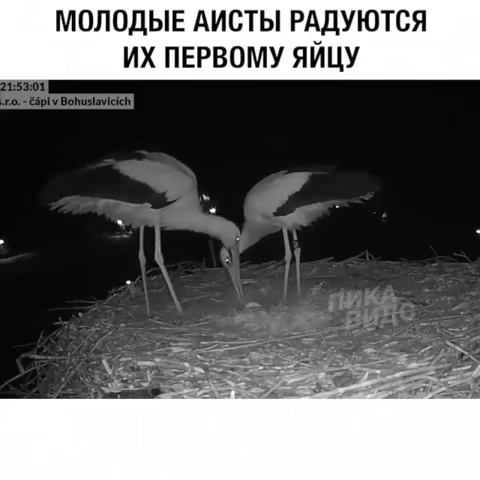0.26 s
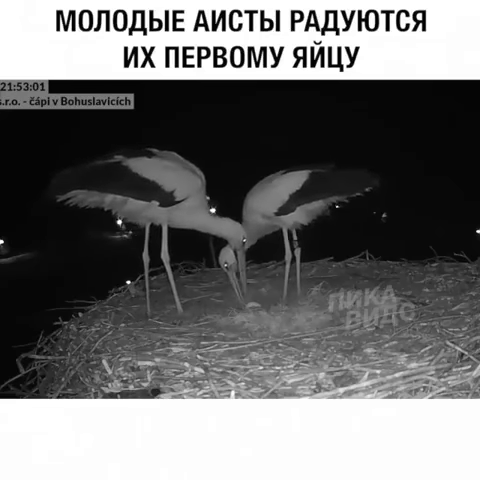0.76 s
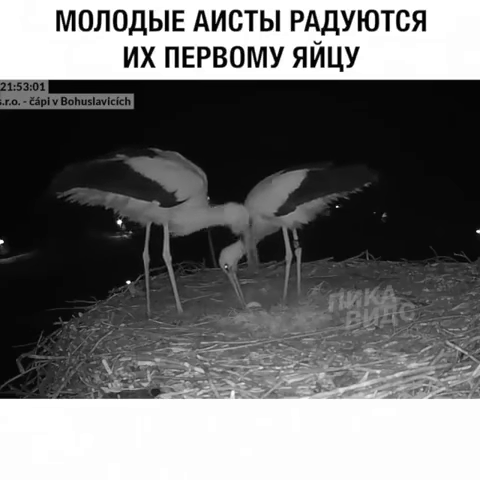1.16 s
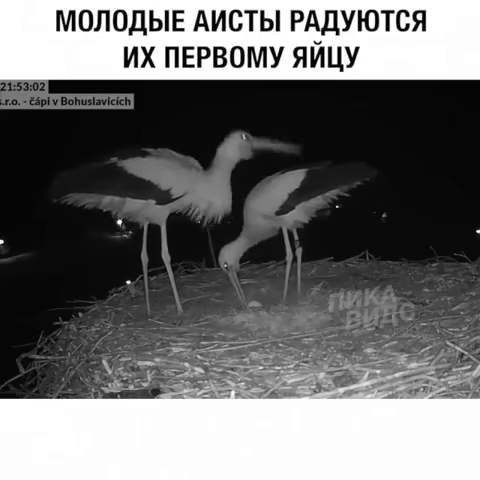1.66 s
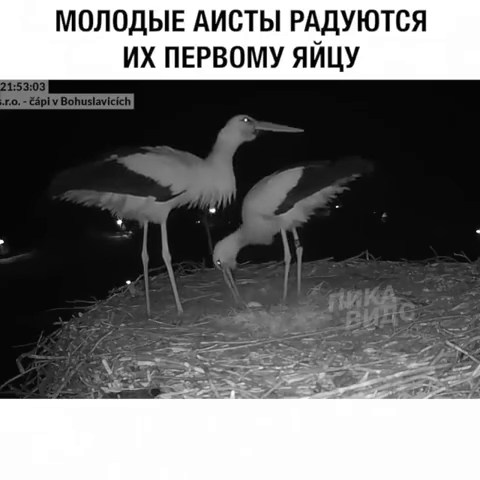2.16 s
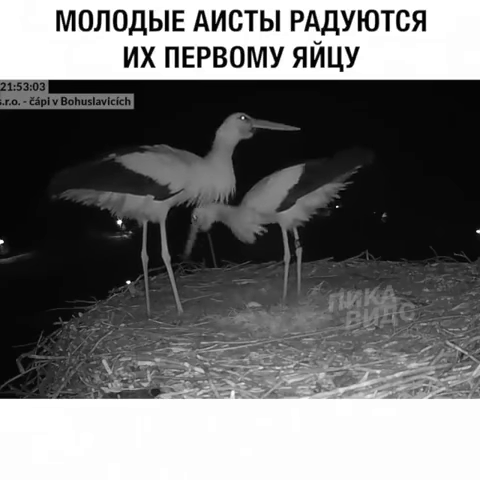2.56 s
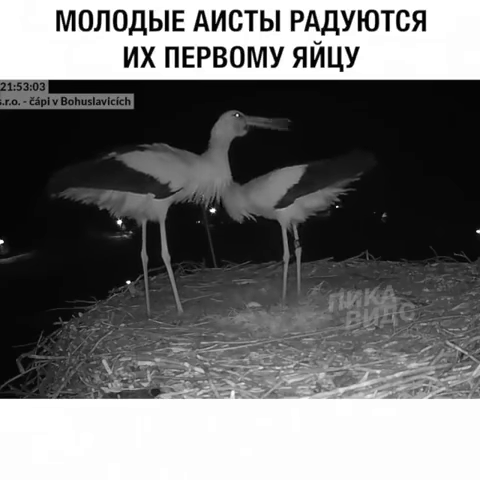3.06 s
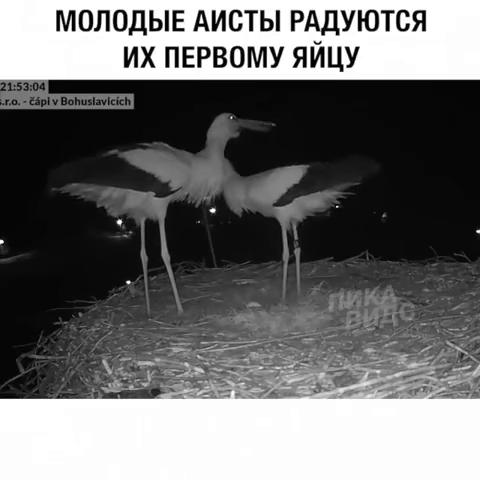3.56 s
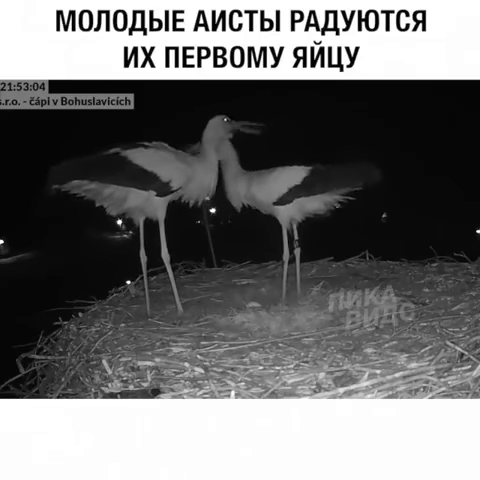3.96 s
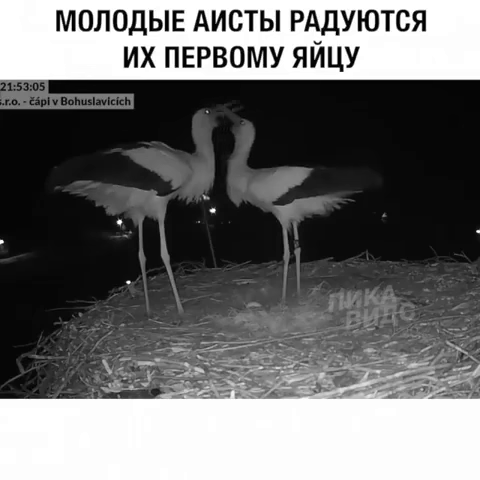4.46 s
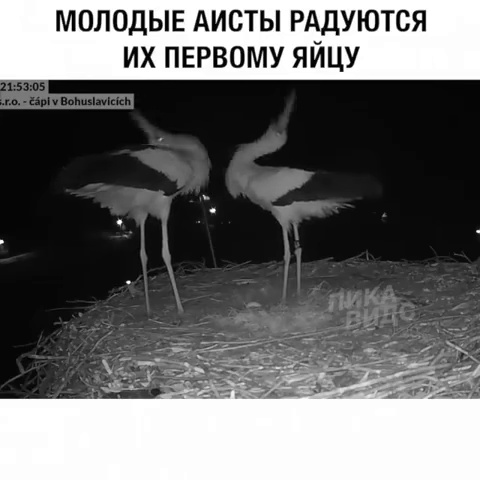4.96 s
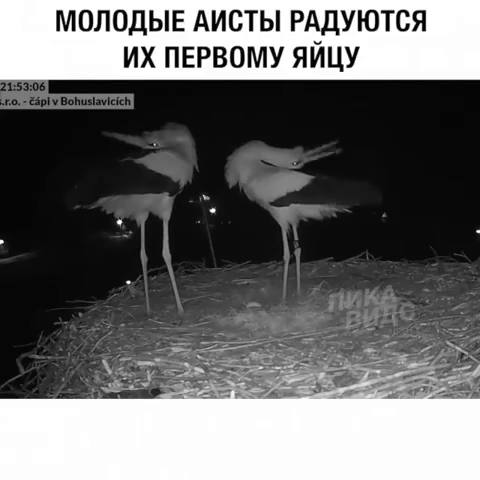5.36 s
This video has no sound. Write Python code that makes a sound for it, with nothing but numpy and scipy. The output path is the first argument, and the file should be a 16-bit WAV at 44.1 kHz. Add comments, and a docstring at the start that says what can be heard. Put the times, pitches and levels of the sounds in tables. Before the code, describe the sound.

Brief airy hisses over a steady night rush, then one stork starts dry bill clapping and a second joins, both quickening to a dense rattle.

```python
"""Short hisses over a steady night rush, then slow bill claps from one stork; its mate joins and both speed up.
Hisses are noise jets through throat resonances; dull noise bumps are feet shifting in the nest.
Each clap is a dry bill snap, a contact crack and a ringing throat pouch retuned as the neck bends.
The nest floor echoes each clap; a close nest camera overloads on the sharpest ones and limits the band."""
import sys
import numpy as np
from scipy import signal
from scipy.fft import rfft, irfft, next_fast_len
from scipy.io import wavfile
from scipy.ndimage import map_coordinates

SR = 44100
rng = np.random.default_rng(int(sys.argv[2]) if len(sys.argv) > 2 else 0)


def file_out(sig):
    """Save sig as 16-bit WAV at sys.argv[1]."""
    # one column per channel
    cols = np.atleast_2d(sig).T
    # limit, then scale
    lim = np.clip(cols, -1, 1)
    pcm = np.round(lim * 32767).astype(np.int16)
    wavfile.write(sys.argv[1], SR, pcm)


N = 246959  # length in samples

# night air and microphone noise spectrum: [freq_hz, level_db]
NIGHT_SPECTRUM = [(15, -55), (25, -20), (96, -13.5), (232, -14), (293, -8.5), (400, -9.5), (432, -6.5),
                  (763, -6.5), (1220, -10.5), (1990, -11.5), (2390, -15.5), (12200, -52), (15900, -82),
                  (22000, -120)]
# feet bumping the nest: [middle_s, length_s, level_db]
FOOT_BUMPS = [(1.46, .05, -60), (1.816, .07, -45), (4.326, 0.22, -51), (5.204, .13, -48.5)]
# hisses: [middle_s, length_s, level_db, low_resonance_hz, main_resonance_hz, fizz_db]
HISSES = [(0.45, 0.13, -39, 2070, 3170, -19), (0.662, 0.13, -35.5, 1870, 3250, -35),
          (0.927, 0.12, -38, 2310, 3330, -18), (1.1, .11, -40.5, 1340, 2930, -22),
          (1.293, 0.094, -40, 2347, 3230, -12.5), (1.457, 0.12, -35, 1180, 3300, -18.5),
          (1.529, 0.1, -43, 2130, 3100, -6.5), (1.772, 0.12, -37, 1090, 3330, -17),
          (2.122, .11, -37.5, 1180, 3040, -19), (2.311, 0.095, -45.5, 2160, 3000, -12.5)]
# fixed hiss resonances: [freq_hz, width_hz, level_db]
WINDPIPE_MODES = [(2330, 62, -1.5), (3470, 460, -1.5)]
# air at the bill's edge, spectrum: [freq_hz, level_db]
FIZZ_SPECTRUM = [(1500, -29), (3500, -3), (4700, 7), (5400, 0), (6300, 4.5), (7300, -5), (8400, -5),
                 (9300, -13), (10400, -7.5), (12000, -21)]
# horn contact spectrum: [freq_hz, level_db]
CRACK_SPECTRUM = [(1500, -6), (3500, -3), (5500, -0.5), (7500, -11.5), (10500, -16), (12000, -22.5)]
# bill tips grazing between claps: [start_s, level_db]
BILL_TICKS = [(4.3853, -41), (4.672, -42), (5.1508, -37), (5.4626, -33), (5.578, -38)]
# bill modes: [freq_hz, level_db, t60_s]
FIRST_BILL = [(1964, 2.5, 0.0022), (2220, -2, 0.011), (2890, -13, 0.016)]
MATE_BILL = [(2370, 5.5, 0.0019), (3500, -11, 0.0029)]
# throat modes: [bill_level_hz, bill_up_hz, head_back_hz, level_db, head_back_gain_db, t60_s]
FIRST_THROAT = [(704, 800, 873, -9, -16, 0.03), (860, 996, 790, -7.5, 3, 0.0078),
                (1671, 1785, 1485, 1, 1, .012), (2274, 2580, 2790, -8.5, -4, 0.015),
                (3330, 3430, 3170, -19, 10.5, 0.012), (3520, 4220, 3500, -8.5, -26, 0.0096)]
MATE_THROAT = [(720, 843, 910, -7, -7, 0.021), (1610, 1814, 1716, -5, 4, 0.016),
               (2413, 2564, 2575, -3, 0, 0.015), (3040, 3070, 3080, -8.5, 6, 0.0087),
               (3820, 3800, 3500, -16, 0.5, 0.026)]
# neck posture: [time_s, bend (0 bill level, 1 bill up, 2 head on the back)]
FIRST_NECK = [(2.3, 0.031), (3.3, 0.39), (4.2, 0.6), (4.65, 1.15), (4.92, 1.16), (5.15, 1.82)]
MATE_NECK = [(3.3, 0.17), (4.1, 0.21), (4.55, 1.1), (5.0, 1.35), (5.35, 1.99)]
# pace, quickening overall: [time_s, interval_s]
FIRST_PACE = [(1.82, 0.1482), (1.97, 0.1368), (2.77, 0.1294), (3.03, 0.1332), (3.3, 0.1306), (3.69, 0.1332),
              (4.21, 0.1233), (4.46, 0.1252), (4.7, 0.109), (4.92, 0.1133), (5.03, 0.1034), (5.44, 0.1003)]
MATE_PACE = [(2.93, 0.1588), (3.09, 0.152), (3.53, 0.1438), (3.82, 0.1416), (4.24, 0.1322), (4.37, 0.1259),
             (4.49, 0.1303), (5.0, 0.1203), (5.48, 0.1167)]
# effort, easing briefly as the necks cross: [time_s, clap_level_db, treble_share_db]
FIRST_EFFORT = [(2.3, -13, -29), (3.53, -12, -25.5), (3.71, -16, -32.5), (3.92, -12, -28),
                (4.38, -11.5, -22.5), (4.65, -13.5, -19.5), (5.02, -14.5, -26.5), (5.2, -10, -19)]
MATE_EFFORT = [(3.35, -15, -28.5), (3.7, -14.5, -35), (3.96, -18.5, -35), (4.15, -15.7, -26.5),
               (4.551, -14.5, -19), (5.0, -13, -20.5), (5.38, -10, -23.5)]

NIGHT_DB = -45
MAIN_WIDTH_HZ, HISS_EDGE_S = 600, 0.049  # main hiss resonance; attack and release, at most half the hiss
FIRST_START_S, MATE_START_S = 1.8235, 2.9277
ECHO_S, ECHO_RISE_S, ECHO_DB = 0.0053, 0.000575, -19.5  # delay, added delay per step of bend, level
TOP_HZ = 11600  # upper band edge


def amp(db):
    """Decibels to gain."""
    return 10 ** (np.asarray(db) / 20)


def unit(x):
    """x at rms 1."""
    return x / np.sqrt(np.mean(x ** 2) + 1e-20)


def blow(x):
    """A short sound scaled to the energy of 10 ms at rms 1."""
    return x / np.sqrt(np.sum(x ** 2) / (SR / 100))


def filtered(x, response):
    """x times a response of frequency."""
    size = next_fast_len(len(x) + 2048)
    hz = np.fft.rfftfreq(size, 1 / SR)
    return irfft(rfft(x, size) * response(hz), size)[:len(x)]


def butter(x, hz, kind, order):
    """A causal low-pass or high-pass."""
    sos = signal.butter(order, min(hz, 0.45 * SR), kind, fs=SR, output="sos")
    return signal.sosfilt(sos, x)


def noise(spectrum, size):
    """Noise of rms 1 coloured by (freq_hz, level_db) points."""
    point_hz, point_db = np.transpose(spectrum)

    def colour(hz):
        return amp(np.interp(np.log(hz + 1), np.log(point_hz), point_db))

    return unit(filtered(rng.standard_normal(size), colour))


def uneven(x, width_hz, depth_db):
    """x at rms 1 with chance peaks and dips in its spectrum, new for every sound."""
    knots = rng.standard_normal(256)

    def ripple(hz):
        return amp(depth_db * map_coordinates(knots, [hz / width_hz], mode="mirror"))

    return unit(filtered(x, ripple))


def ring(t, hz, db, t60):
    """A damped mode, silent before t = 0; t60 is its 60 dB decay in s."""
    t = np.maximum(t, 0)
    return amp(db - 60 * t / t60) * np.sin(2 * np.pi * hz * t)


def add(track, start_s, x):
    """Mix x into the track at start_s."""
    part = track[max(round(start_s * SR), 0):][:len(x)]
    part += x[:len(part)]


def night():
    """A rush of night air and microphone noise that wavers slightly."""
    waver_db = 0.34 * unit(butter(rng.standard_normal(N), 12, "low", order=2))
    return amp(NIGHT_DB + waver_db) * noise(NIGHT_SPECTRUM, N)


def footfall():
    """Dull low-frequency bumps in the nest as the birds shift their weight."""
    out = np.zeros(N)
    spectrum = [(20, -3), (70, 4), (150, -2), (400, -1), (1500, -39.0)]
    for middle_s, length_s, level_db in FOOT_BUMPS:
        size = int(length_s * SR)
        bump = np.hanning(size) * noise(spectrum, size)
        add(out, middle_s - length_s / 2, amp(level_db) * bump)
    return out


def throat_response(hz, modes):
    """Parallel resonances of a voiceless throat, alternating in sign up the spectrum."""
    total = 0
    for k, (center_hz, width_hz, level_db) in enumerate(sorted(modes)):
        damping = 1j * hz * width_hz
        total = total + (-1) ** k * amp(level_db) * damping / (center_hz ** 2 - hz ** 2 + damping)
    return total


def hisses():
    """Short jets of air through the throat resonances, with turbulence and fizz at the bill's edge."""
    out = np.zeros(N)
    rush_spectrum = [(500, -5), (1100, -5), (2600, -1), (3800, 6), (4500, -28), (7000, -43)]
    for middle_s, length_s, level_db, low_hz, main_hz, fizz_db in HISSES:
        size = int(length_s * SR)
        low_db = -0.5 - 0.2 * (fizz_db + 19)  # less fizz: deeper in the throat
        modes = [(low_hz, 0.12 * low_hz, low_db), (main_hz, MAIN_WIDTH_HZ, 0)]
        modes += map(tuple, WINDPIPE_MODES)
        jet = filtered(rng.standard_normal(size), lambda hz: throat_response(hz, modes))
        jet = unit(butter(jet, 4500, "low", order=8))
        # broad turbulence fills the valleys between resonances
        rush = amp(-3.5) * noise(rush_spectrum, size)
        fizz = amp(fizz_db) * uneven(noise(FIZZ_SPECTRUM, size), width_hz=486, depth_db=2.8)
        sputter_db = 2 * unit(butter(rng.standard_normal(size), 170, "low", order=2))
        swell = unit(amp(sputter_db)) * signal.windows.tukey(size, 2 * HISS_EDGE_S / length_s)
        add(out, middle_s - length_s / 2, amp(level_db) * swell * (jet + rush + fizz))
    return out


def crack(t, t60, tail_db, tail_t60):
    """Bright contact noise with a faint scatter from the twigs of the nest."""
    horn = uneven(noise(CRACK_SPECTRUM, len(t)), width_hz=560, depth_db=2.0)
    decay = amp(-60 * t / t60) + amp(tail_db - 60 * t / tail_t60)
    return blow(horn * decay)


def ticks():
    """The bill tips graze each other without ringing the throat."""
    out, t = np.zeros(N), np.arange(SR // 20) / SR
    for start_s, level_db in BILL_TICKS:
        tip = blow(ring(t, 2140, 0, 0.0039))
        graze = amp(-16) * crack(t, t60=0.016, tail_db=-11, tail_t60=0.024)
        add(out, start_s, amp(level_db) * (tip + graze))
    return out


def clap_times(start_s, pace):
    """Each clap follows the last at the bird's current pace."""
    times = [start_s]
    while times[-1] < N / SR:
        times.append(times[-1] + np.interp(times[-1], *np.transpose(pace)))
    return times[:-1]


def bout(start_s, pace, neck, effort, timid_db, timid_share):
    """Rows (start_s, bend, level_db, treble_db): the first claps are timid, each less so than the last."""
    claps = []
    effort_s, *effort_columns = np.transpose(effort)
    for k, clap_s in enumerate(clap_times(start_s, pace)):
        bend = np.interp(clap_s, *np.transpose(neck))
        level_db, treble_db = (np.interp(clap_s, effort_s, column) for column in effort_columns)
        level_db = level_db - timid_db * min(timid_share, 1) ** k
        claps.append((clap_s, bend, level_db, treble_db))
    return claps


def bill_snap(t, bill):
    """The mandibles strike and ring briefly, tuned slightly differently each time."""
    return sum(ring(t, hz * (1 + rng.normal(0, 0.0067)), db, t60) for hz, db, t60 in bill)


def throat_pouch(t, throat, bend):
    """The pouch rings at modes tuned by the bend of the neck."""
    back = max(bend - 1, 0)
    pouch = np.zeros(len(t))
    for *tuning_hz, level_db, back_db, t60 in throat:
        hz = np.interp(bend, np.arange(3), tuning_hz)
        mode_db = level_db + back * back_db + rng.normal(0, 0.84)
        pouch += ring(t, hz, mode_db, t60)
    return pouch


def clatter(claps, bill, throat, lag_s, soft_hz, thin_hz, away_db, crack_db):
    """The mandibles snap shut; a moment later the throat rings; the nest floor echoes both."""
    out, t = np.zeros(N), np.arange(SR // 20) / SR
    for start_s, bend, level_db, treble_db in claps:
        back = max(bend - 1, 0)
        delay_s = lag_s * (1 + rng.normal(0, 0.05))
        # the bill turns away from the microphone as the head goes back
        body = amp(away_db * bend) * bill_snap(t, bill) + throat_pouch(t - delay_s, throat, bend)
        body = butter(body, 507, "high", order=2)
        # the stretched pouch radiates less bass
        body = butter(body, thin_hz * (1 + 0.81 * back), "high", order=3)
        # harder blows have a shorter contact and are brighter
        body = butter(body, soft_hz * amp(0.13 * (treble_db + 26.5)), "low", order=3)
        edge = amp(treble_db + crack_db) * crack(t, t60=0.0038, tail_db=-14, tail_t60=0.042)
        clap = amp(level_db) * (blow(body) + edge)
        add(out, start_s, clap)
        # weak, bright floor echo, later as the head rises
        echo_s = start_s + ECHO_S + ECHO_RISE_S * bend + rng.normal(0, 0.00023)
        add(out, echo_s, amp(ECHO_DB) * butter(clap, 550, "high", order=1))
    return out


def scene():
    """Both birds and the night at one microphone, the same in both channels."""
    first_claps = bout(FIRST_START_S, FIRST_PACE, FIRST_NECK, FIRST_EFFORT, timid_db=19.5, timid_share=0.32)
    mate_claps = bout(MATE_START_S, MATE_PACE, MATE_NECK, MATE_EFFORT, timid_db=13.0, timid_share=0.53)
    first = clatter(first_claps, FIRST_BILL, FIRST_THROAT, lag_s=0.001206,
                    soft_hz=3460, thin_hz=460, away_db=-4, crack_db=3.5)
    mate = clatter(mate_claps, MATE_BILL, MATE_THROAT, lag_s=0.00126,
                   soft_hz=3400, thin_hz=560, away_db=-0.5, crack_db=2.5)
    mono = night() + footfall() + hisses() + ticks() + mate + first
    return np.array([mono, mono])


def record(dry):
    """The camera overloads at full scale and keeps a limited band."""
    clipped = np.clip(dry, -1, 1)
    # each overload shifts the amplifier's bias for a moment: a low thump
    thump = amp(-5) * butter(np.abs(dry - clipped), 430, "low", order=2)

    def band(hz):
        return 1 / np.sqrt(1 + (hz / TOP_HZ) ** 48)

    return np.array([filtered(side, band) for side in clipped - thump])


dry = scene()
out = record(dry)
file_out(out)
```